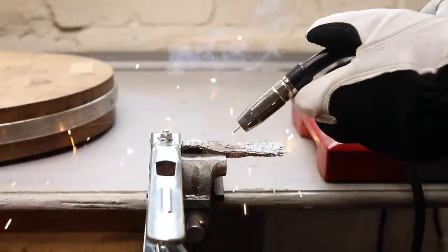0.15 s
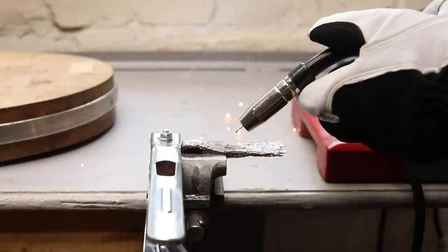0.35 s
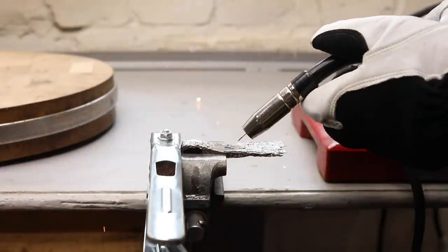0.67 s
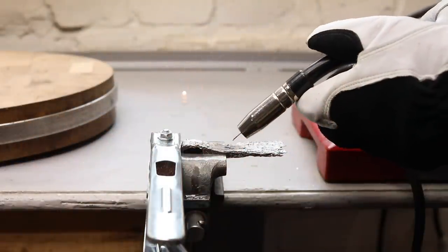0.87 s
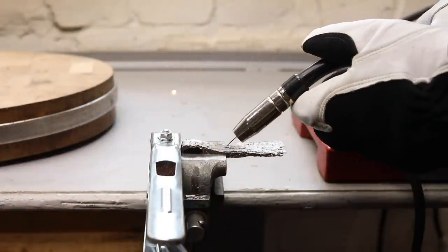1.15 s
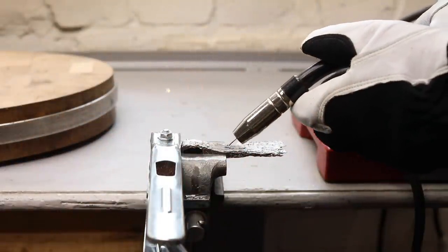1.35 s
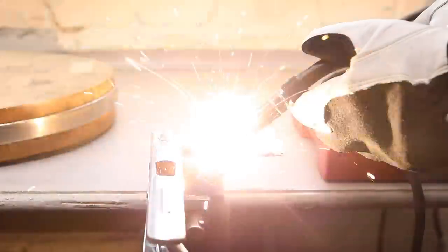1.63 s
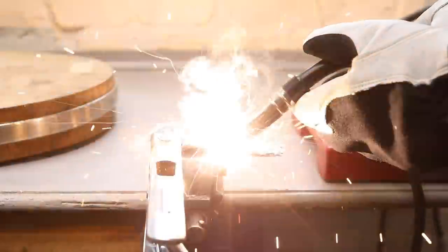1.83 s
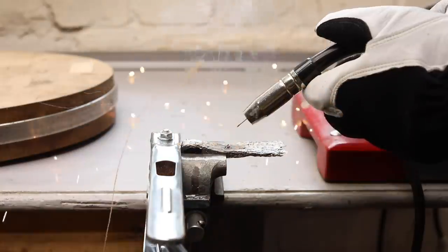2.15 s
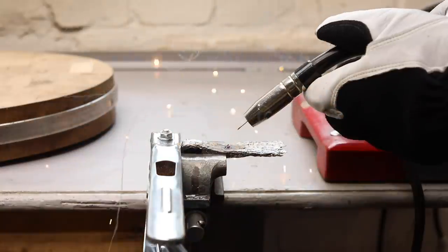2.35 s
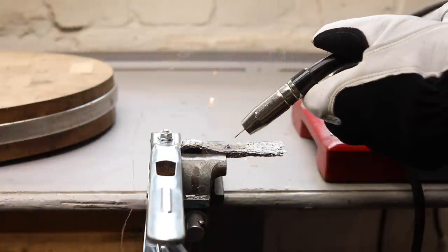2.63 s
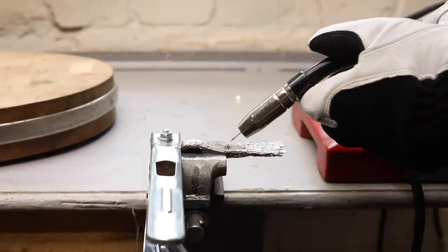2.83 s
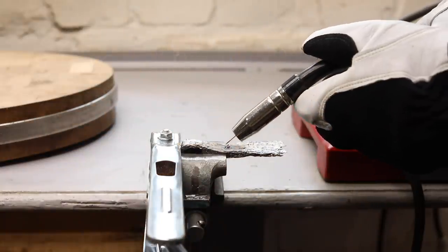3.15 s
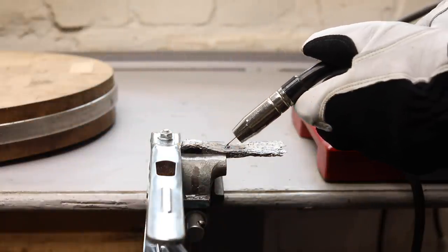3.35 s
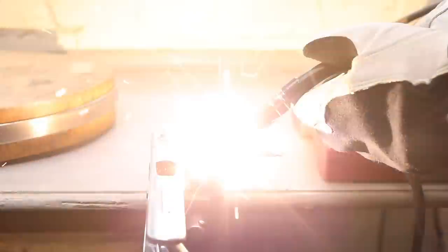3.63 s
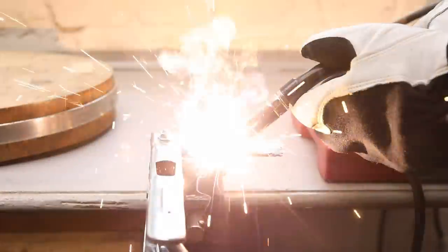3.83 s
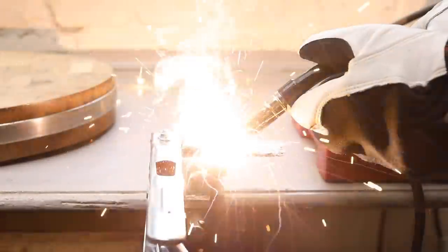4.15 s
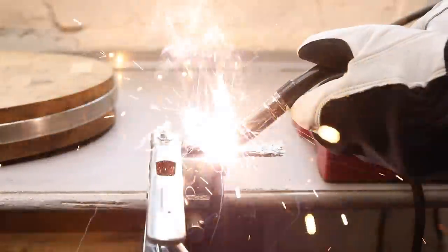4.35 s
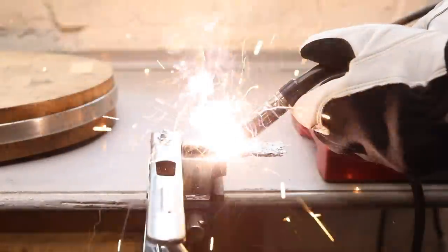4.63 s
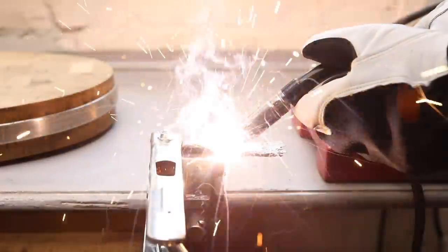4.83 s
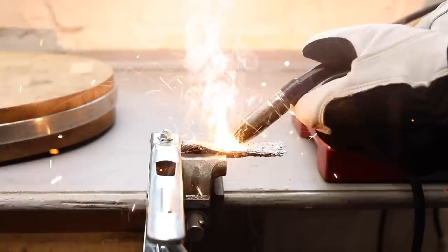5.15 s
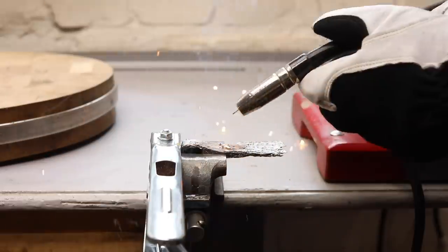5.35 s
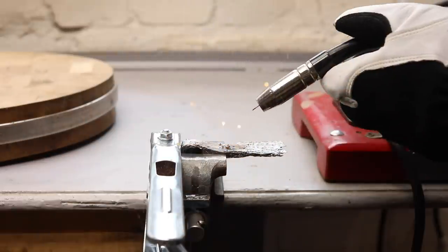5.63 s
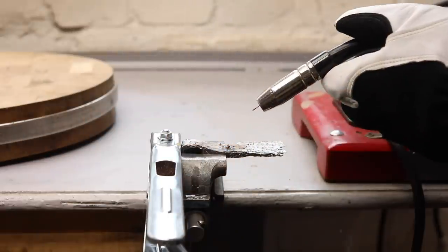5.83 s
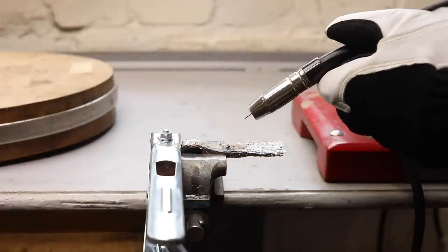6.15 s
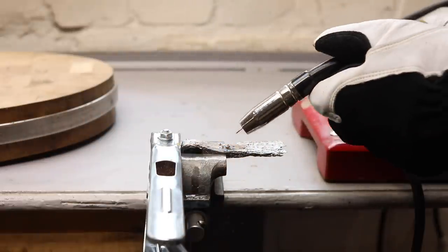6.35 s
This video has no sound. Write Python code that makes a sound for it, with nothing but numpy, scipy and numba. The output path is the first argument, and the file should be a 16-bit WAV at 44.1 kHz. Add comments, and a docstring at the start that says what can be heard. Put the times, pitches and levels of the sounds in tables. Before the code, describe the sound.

In a small workshop, a welding machine's fan hums steadily with a hollow rush of air. The end of a weld snaps off at once, then near quiet. A wire motor whirs faintly and a short tack weld cracks hard. After another pause a longer bead spits and sizzles, with ringing metal and short room echo. Close microphone; the fan dips beneath each weld and slowly swells back.

```python
"""The fan of a wire-feed welder hums throughout, as steady tones over a rush of air; at first an earlier weld is just ending.
Faint ticks come before a short tack weld and after it; then a longer bead is laid.
At each weld the feed motor whirs, the arc sizzles in swelling clicks, and pulses pop as the wire shorts into the pool.
Echoes, ringing metal and a decaying tail return the weld sounds from bench and walls; sparks tick down afterwards.
The recorder's gain control ducks under every weld, so the fan sinks and slowly swells again."""
import sys
import numpy as np
from scipy import signal
from scipy.fft import rfft, irfft
from scipy.io import wavfile
from scipy.ndimage import uniform_filter1d
from numba import njit

SR = 44100
rng = np.random.default_rng(int(sys.argv[2]) if len(sys.argv) > 2 else 0)


def digitize_waveform(pressure):
    """Quantize a signal to 16-bit integers and store it at the path in sys.argv[1].

    Rows of a 2-D input are taken as channels; values are limited to [-1, 1].
    """
    field = np.atleast_2d(pressure).T
    bounded = np.clip(field, -1, 1)
    quanta = np.round(bounded * 32767).astype(np.int16)
    wavfile.write(sys.argv[1], SR, quanta)


N = 285754
TIME = np.arange(N) / SR  # s

SHAFT_HZ = 82.05
# Fan tones; four blades make the fourth the strongest. Each row: multiple of the shaft rate, relative level in dB.
FAN_TONES = [(1, -57.5), (3, -50.5), (4, -27), (7, -39), (12, -52.5)]
# Slow wavering of the fan tones. Each row: time in seconds, level change in dB.
FAN_TONE_LEVEL = [(0.25, -3.5), (0.6, 0.5), (1.42, 1.5), (1.58, -1.5), (1.8, -1), (2.18, -1), (2.45, -1.5),
                  (3.38, 1.5), (4.3, -5), (5.1, -4.5), (5.7, 1)]
# Spectrum of the air rushing through the case. Each row: frequency in Hz, relative density in dB.
AIR_SPECTRUM = [(30, -25), (120, -23.5), (170, -14), (240, -7), (300, 0), (450, -4.5), (520, -3.5),
                (700, -6), (1000, -6), (1700, -14), (4300, -19), (5400, -21.5), (7000, -31), (11000, -41.5),
                (15000, -48)]
# Case resonances that the air excites. Each row: frequency in Hz, width in Hz, height above the rush in dB.
CASE_RESONANCES = [(289, 17, 4.5), (362, 34, 11), (402.5, 47.8, 17.5), (614, 108, 8), (705, 26, 10),
                   (1028, 17, 5.5), (2247, 120, 5), (4130, 820, 4.5), (5200, 570, 3.5)]

# The arc burns. Each row: start in seconds, stop in seconds, fading of the sizzle after the stop in dB per second.
WELD_SPANS = [(-1, .01, 200), (1.626, 1.94, 200), (3.583, 5.215, 400)]
# Swells of the hiss: mostly the arc lengthening; the row at .14 is the wash that follows the earlier weld's end.
# Each row: time of the top in seconds, rise in seconds, swell in dB over the steady sizzle.
HISS_SWELLS = [(.01, 0.079, 17), (.14, 0.1, 17.5), (1.788, 0.025, 6), (1.92, 0.074, 12.5), (3.601, 0.02, 9),
               (3.714, 0.24, 15.5), (3.771, 0.028, 17.5), (3.855, 0.052, 17), (4.344, 0.017, 3),
               (4.624, 0.02, 17.5), (4.848, 0.022, 10), (5.215, 0.016, 6)]
SWELL_FALL_S = 0.038
# Spectrum of the sizzle. Each row: frequency in Hz, relative density in dB.
SIZZLE_SPECTRUM = [(60, -8), (400, 6.5), (1100, 5), (1750, 5), (2600, 5.5), (3700, 5.5), (4400, 8),
                   (5500, 9), (6700, 3), (8300, 4), (11000, -2.5), (15000, -13.5)]
# A fresh arc is quieter and hoarser until the pool has warmed.
COLD_DB, WARM_S, HOARSE_DB, HOARSE_HZ = -10, 1.0, 0.5, 2830

# The wire shorts into the pool and bursts; heavy drops thud, light ones only tick.
# Each row: time in seconds, relative peak in dB, level of the low body in dB.
LOUD_POPS = [(.003, 22.5, -6), (.022, 8, 3), (1.6358, 34, 3), (1.6719, 34, 1), (1.6885, 28.5, -0.5),
             (1.772, 5, 1), (1.7873, 35.5, 0.5), (1.8941, 12, -2), (1.9063, 12.5, -3), (1.9165, 10, 0),
             (1.9195, 10, 0), (1.9553, -1, 4), (3.6024, 19, 0), (3.7124, 11, 2), (3.7697, 29, 4),
             (3.8561, 28, 5), (3.8886, 34, 0), (3.9071, 25, -8), (3.9135, 20, 2), (3.9215, 20, -8),
             (3.9942, 24, 1), (4.0018, 25, -3), (4.0115, 26, -8), (4.0208, 27.5, 0.5), (4.0381, 21, 0),
             (4.0453, 27, -5), (4.0574, 20, -1), (4.0673, 28, -2.5), (4.0794, 19, -17), (4.1206, 19, -8),
             (4.1265, 25.5, 0), (4.148, 23, -12), (4.1595, 27.5, -2.5), (4.178, 19, -7), (4.1875, 16, -1),
             (4.2466, 10, -12), (4.2596, 6, -12), (4.335, 9, -16), (4.3469, 15, 5.5), (4.3581, 19, 2.5),
             (4.3714, 10, -3), (4.3912, 18, 2), (4.401, 16, 4), (4.41, 17, 1.5), (4.4333, 1, -2),
             (4.4438, 24, -1), (4.4551, 27, -1), (4.4649, 26, -4), (4.476, 23, 1), (4.507, 22, -10),
             (4.5134, 16, -5), (4.525, 22.5, -1), (4.5355, 25, -0.5), (4.556, 11, -8), (4.5805, 6, -4),
             (4.6236, 20.5, -6), (4.638, 23, -7.5), (4.6592, 8, -16), (4.6759, 23, 1.5), (4.6854, 12, -5),
             (4.6914, 5, -4), (4.7065, 16, -11), (4.7354, 10, -7), (4.7398, 23, -10), (4.7789, 24, 1),
             (4.7893, 20, 0.5), (4.8326, 7, -15), (4.8417, 14, -17), (4.8477, 12, -4), (4.852, 8, -2),
             (4.8693, 29.5, -5.5), (4.902, 8, -2), (4.922, 25.5, 4), (4.933, 27, 1.5), (4.964, 29.5, 1),
             (4.9858, 14, -17.5), (4.9955, 18, -8), (5.0024, 24.5, 2.5), (5.0379, 26, 2.5),
             (5.0476, 24, 3.5), (5.0652, 25.5, -10), (5.1049, 18, -2), (5.1136, 31, 1.5),
             (5.1356, 15, -3.5), (5.213, 21.5, -0.5)]
# The cold wire touches the work and blows apart. Each row: start in seconds, length in seconds, relative level in dB.
WIRE_STRIKES = [(1.6223, 0.0064, 8.5), (3.5798, 0.0047, 7.5)]
# Spectrum of a pop. Each row: frequency in Hz, relative level in dB.
POP_SPECTRUM = [(30, -6), (100, -3.5), (165, 4.5), (260, -1), (600, -2), (1750, -0.5), (2400, -3.5),
                (3200, -1.5), (3800, 1.84), (5600, 2.5), (6500, -3), (8300, 3.5), (9300, -4), (10400, -3),
                (11200, -6), (12400, -1), (14500, -3), (18000, -3.5)]
# Small, thin shorts crackle at random all through a weld, as the pool rocks.
POOL_PERIOD_S, CRACKLE_PER_S = 0.008, 55
CRACKLE_DB, CRACKLE_SPREAD_DB, CRACKLE_BODY_DB = 5, 4.5, -10.5

# Echoes from the bench and the near wall. Each row: delay in seconds, level in dB against the direct sound.
NEAR_ECHOES = [(.003, -8), (.006, -20)]
# Resonances of the bench and the vice. Each row: frequency in Hz, width in Hz, level in dB against the direct sound.
BENCH_MODES = [(1085, 68, -11), (1697, 140, -8.5), (3700, 58, -8), (4120, 120, -9), (4800, 48, -2.5),
               (5330, 23, -7.5), (5800, 58, -21), (7450, 88, -12)]
# Decay of the room by 60 dB: below and above the treble crossover.
ROOM_T60_S, TREBLE_T60_S = 0.57, 0.39

# Landing drops and rubs of the glove between welds. Each row: start in seconds, rise time in seconds, relative level in dB.
FAINT_TICKS = [(0.88, 0.018, -53), (1.983, 0.0018, -29.5), (2.324, 0.00088, -46), (2.436, 0.0012, -42)]
# The wire feed motor runs while the trigger is held. Each row: start in seconds, stop in seconds.
FEED_SPANS = [(1.47, 1.96), (3.56, 5.2)]

TOP_HZ, CEILING = 15900, .38  # upper band limit; saturation amplitude of the recorder


def undb(db):
    """Definition of the decibel: level to amplitude ratio."""
    return 10 ** (np.asarray(db) / 20)


def unit(x):
    """Normalization of power: scale to rms 1."""
    return x / np.sqrt(np.mean(x ** 2))


def walk(rate):
    """Smoothed random process: levels held 1 / rate s and averaged twice; spread near 1."""
    hold = int(SR / rate)
    steps = np.repeat(rng.standard_normal(N // hold + 1), hold)
    return 1.3 * uniform_filter1d(uniform_filter1d(steps, hold), hold)[:N]


def contour(points, freqs):
    """Spectral envelope: (Hz, dB) points joined on a log-frequency axis."""
    hz, db = np.transpose(points)
    return np.interp(np.log(freqs + 1), np.log(hz), db)


def colour(x, points, peaks=()):
    """Spectral shaping: a smooth envelope with resonances standing on it."""
    freqs = np.fft.rfftfreq(N, 1 / SR)
    power = 1
    for hz, width, db in peaks:
        power = power + (undb(db) ** 2 - 1) / (1 + (2 * (freqs - hz) / width) ** 2) ** 2
    return irfft(rfft(x) * undb(contour(points, freqs)) * np.sqrt(power), N)


def sieve(x, kind, hz):
    """Second-order Butterworth filtering: a gentle low-pass or high-pass."""
    return signal.sosfilt(signal.butter(2, hz, kind, fs=SR, output="sos"), x)


def snap(points, size=512):
    """Minimum phase by the folded cepstrum: the shortest causal pulse with this spectrum, peak 1."""
    cepstrum = irfft(np.log(undb(contour(points, np.fft.rfftfreq(size, 1 / SR)))))
    cepstrum[1:size // 2] *= 2
    cepstrum[size // 2 + 1:] = 0
    pulse = irfft(np.exp(rfft(cepstrum)))
    return pulse / np.abs(pulse).max()


def ring(x, response):
    """Linear superposition: convolve a sound with an impulse response."""
    return signal.fftconvolve(x, response)[:N]


def scatter(t60):
    """Diffuse reverberation: dense reflections in exponential decay; energy 1."""
    tail = rng.standard_normal(SR) * undb(-60 * TIME[:SR] / t60)
    return tail / np.linalg.norm(tail)


def fan(air_db=-30, flutter_db=1.37, speed_drift=0.0013, gust_db=0.3):
    """Blade-passing tones and flow noise: tones waver in turbulent inflow, and air rings the steel case."""
    turns = np.cumsum(SHAFT_HZ * (1 + speed_drift * walk(5.3))) / SR
    tones = 0
    for multiple, db in FAN_TONES:
        level = np.sqrt(2) * undb(db + flutter_db * walk(30))
        tones = tones + level * np.sin(2 * np.pi * (multiple * turns + rng.random()))
    tones = tones * undb(np.interp(TIME, *np.transpose(FAN_TONE_LEVEL)))
    rush = rng.standard_normal(N)
    # near surfaces leave a fixed ripple in the spectrum of the rush
    rush = rush + .3 * sieve(ring(rush, scatter(.12)), "high", 900)
    air = unit(colour(rush, AIR_SPECTRUM, CASE_RESONANCES))
    return tones + air * undb(air_db + gust_db * walk(9.2))


def coldness(s):
    """Exponential warming: each strike adds 1, which decays as the pool warms."""
    return sum((s >= start) * np.exp(-np.maximum(s - start, 0) / WARM_S) for start, _, _ in WELD_SPANS)


def sizzle(sizzle_db=-23.5, grain_db=2.0, flicker_db=3):
    """Shot noise: a dense spray of tiny uneven clicks from the burning arc, with swells of the hiss."""
    burn = sum((TIME >= start) * undb(-fade * np.maximum(TIME - stop, 0)) for start, stop, fade in WELD_SPANS)
    swell_db = 0
    for top, rise, db in HISS_SWELLS:
        swell = np.interp(TIME, [top - rise, top, top + SWELL_FALL_S], [0, 1, 0])
        swell_db = swell_db + db * np.sqrt(swell)
    sizes = undb(grain_db * np.minimum(rng.exponential(size=N), 5))
    grains = rng.standard_normal(N) * sizes * (rng.random(N) < .16)  # 16 % of samples carry a click
    spray = unit(colour(grains, SIZZLE_SPECTRUM))
    cold = coldness(TIME)
    breath = unit(colour(rng.standard_normal(N), SIZZLE_SPECTRUM))
    hoarse = sieve(breath, "low", HOARSE_HZ) * cold * undb(HOARSE_DB)
    level_db = sizzle_db + COLD_DB * cold + swell_db + flicker_db * walk(70)
    return (spray + hoarse) * burn * undb(level_db)


def shorts():
    """Random short circuits in a rocking pool, after the loud pops: rows of (s, peak dB, body dB)."""
    rows = list(LOUD_POPS)
    for k, (luck, late, strength) in enumerate(rng.random(size=(1024, 3))):
        s = (k + late / 2) * POOL_PERIOD_S  # one chance each time the pool rocks
        burning = any(start < s < stop for start, stop, _ in WELD_SPANS)
        if luck < CRACKLE_PER_S * POOL_PERIOD_S and burning:
            peak_db = CRACKLE_DB + COLD_DB * coldness(s) + CRACKLE_SPREAD_DB * (2 * strength - 1)
            rows.append((s, peak_db, CRACKLE_BODY_DB))
    return rows


def pops(pop_db=1.5, spray_db=-30, spray_s=0.0012, split_s=0.0003, split_db=-9, thump_db=-24,
         roar_low_hz=450, puff_db=-50, puff_s=0.0015, cold_spray_db=15, cold_stretch=1.0,
         cold_puff_db=20, body_hz=2200, size=1024):
    """Impulsive radiation: a bursting metal bridge gives a pulse, spray and gas puff, longer and lower if cold."""
    out, age = np.zeros(N + size), TIME[:size]
    lows = signal.butter(1, body_hz, fs=SR, output="sos")
    hiss = sieve(rng.standard_normal(N), "high", body_hz)
    roar = sieve(sieve(rng.standard_normal(N), "low", body_hz), "high", roar_low_hz)
    for s, length, db in WIRE_STRIKES:
        at = int(s * SR)
        thump = undb(thump_db) * np.exp(-age / spray_s)  # the first puff of hot gas
        blast = np.sqrt(age / length) * np.exp(-(age / length) ** 4)  # grows until the wire parts
        noise = hiss[at:at + size] + 2 * roar[at:at + size]
        out[at:at + size] += undb(db) * (noise * blast - thump)
    # a bridge parts in two steps, which colours each pop differently
    splits = rng.random(size=(1024, 2))
    for (s, db, body_db), (late, share) in zip(shorts(), splits):
        at, cold = int(s * SR), min(coldness(s), .5)
        spray = hiss[at:at + size] + 2 * cold * roar[at:at + size]
        decay = np.exp(-age / (spray_s * (1 + cold * cold_stretch)))
        burst = undb(spray_db + cold * cold_spray_db) * spray * decay
        burst[0] = -1
        burst[1 + int(late * split_s * SR)] += undb(split_db) * (2 * share - 1)
        burst = burst - undb(puff_db + cold * cold_puff_db) * np.exp(-age / puff_s)
        burst = burst + (undb(body_db) - 1) * signal.sosfilt(lows, burst)
        out[at:at + size] += undb(db + pop_db) * burst
    return ring(out[:N], snap(POP_SPECTRUM))


def workshop(x, clutter_db=-15, clutter_t60=0.16, room_db=-9.0, dull_hz=6200, thin_hz=350):
    """Room acoustics: near echoes, ringing and scatter of vice and tools, then a tail whose treble dies first."""
    age = TIME[:SR]
    low_tail = sieve(sieve(scatter(ROOM_T60_S), "low", dull_hz), "low", dull_hz)
    treble_tail = sieve(scatter(TREBLE_T60_S), "high", dull_hz) / 2
    tail = (low_tail + treble_tail) * np.minimum(age / 0.02, 1)  # builds up over 20 ms
    response = sieve(undb(clutter_db) * scatter(clutter_t60) + undb(room_db) * tail, "high", thin_hz)
    for hz, width, db in BENCH_MODES:
        strength = undb(db) * 2 * np.pi * width / SR
        response += strength * np.exp(-np.pi * width * age) * np.cos(2 * np.pi * hz * age)
    response[0] += 1  # direct sound
    for delay, db in NEAR_ECHOES:
        response[int(delay * SR)] += undb(db)
    return ring(x, response)


def spatter(spatter_db=-44, per_s=150, fade_db_per_s=5, low_hz=9000):
    """Poisson impacts: sparks rain down as tiny bright ticks that grow fainter after each weld."""
    falling = 0
    for _, stop, _ in WELD_SPANS:
        falling = falling + (TIME > stop) * undb(-fade_db_per_s * np.maximum(TIME - stop, 0))
    sparks = (rng.random(N) < per_s / SR) * rng.standard_normal(N)
    return undb(spatter_db) * falling * sieve(sparks, "high", low_hz)


def ticks(low_hz=5000):
    """Transient contact noise: bright bursts that swell over their rise time and then die away."""
    swell = 0
    for s, rise, db in FAINT_TICKS:
        age = np.maximum(TIME - s, 0) / rise
        swell = swell + undb(db) * age * np.exp(1 - age)
    return swell * sieve(rng.standard_normal(N), "high", low_hz)


def feeder(whine_hz=4980, whine_db=-51, scrape_db=-48.0, scrape_low_hz=4000, scrape_high_hz=5600,
           hum_hz=120, hum_db=-58):
    """Motor tones and friction noise: low hum, rough drive whine and wire scraping along its liner."""
    # ramps of 70 ms at start and stop
    running = sum(np.clip(np.minimum(TIME - start, stop - TIME) / 0.07, 0, 1) for start, stop in FEED_SPANS)
    whine = np.sqrt(2) * walk(400) * np.sin(2 * np.pi * whine_hz * TIME)
    hum = np.sqrt(2) * (1 + 0.46 * walk(26)) * np.sin(2 * np.pi * hum_hz * TIME)
    band = signal.butter(4, [scrape_low_hz, scrape_high_hz], "band", fs=SR, output="sos")
    scrape = unit(signal.sosfilt(band, rng.standard_normal(N)))
    return running * (undb(whine_db) * whine + undb(scrape_db) * scrape + undb(hum_db) * hum)


def scene():
    """Superposition of sources: only the arc, its pops and its sparks excite the workshop response."""
    weld = workshop(sizzle() + pops() + spatter())
    return (fan() + weld + ticks() + feeder())[None]


@njit
def gain_control(x, treble, threshold, attack, quick_s, charge_s, sink, recover, let_go, quick, ceiling):
    """Feedback compression: treble over the threshold drives a quick gain cut, which charges a slow one (dB)."""
    y, slow = np.empty(len(x)), 0.
    for i in range(len(x)):
        gain = 10 ** (-(quick + slow) / 20)
        y[i] = ceiling * np.tanh(gain * x[i] / ceiling)  # the first front of a pop overloads
        excess = max(min(gain * abs(treble[i]), ceiling) - threshold, 0.)
        quick = max(quick + (attack * excess - quick / quick_s - let_go) / SR, 0.)
        # the slow part sinks at a limited rate, so a long weld ducks the gain for longer
        slow = max(slow + (min(quick / charge_s, sink) - recover) / SR, 0.)
    return y


def record(dry, threshold_db=-25.5, attack=63000.0, quick_s=0.18, charge_s=0.2, sink_db=30.0,
           recover_db=13.0, let_go_db=95, quick_db=27):
    """Automatic gain control and band limiting: gain starts turned down by earlier welding; the top is cut."""
    # attack is in dB per second per unit of excess; sink, recover and let_go in dB per second
    treble = sieve(dry[0], "high", 3100)
    y = gain_control(dry[0], treble, float(undb(threshold_db)), attack, quick_s, charge_s,
                     float(sink_db), float(recover_db), float(let_go_db), float(quick_db), CEILING)
    return signal.sosfilt(signal.ellip(10, .1, 70, TOP_HZ, fs=SR, output="sos"), y)[None]


dry = scene()
out = record(dry)
digitize_waveform(out)
```